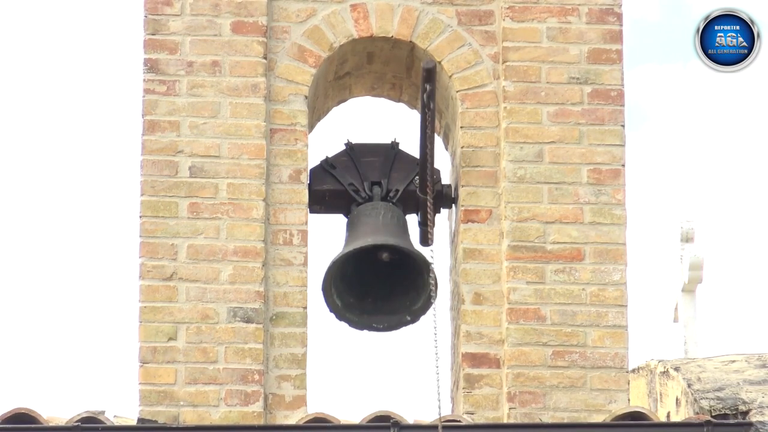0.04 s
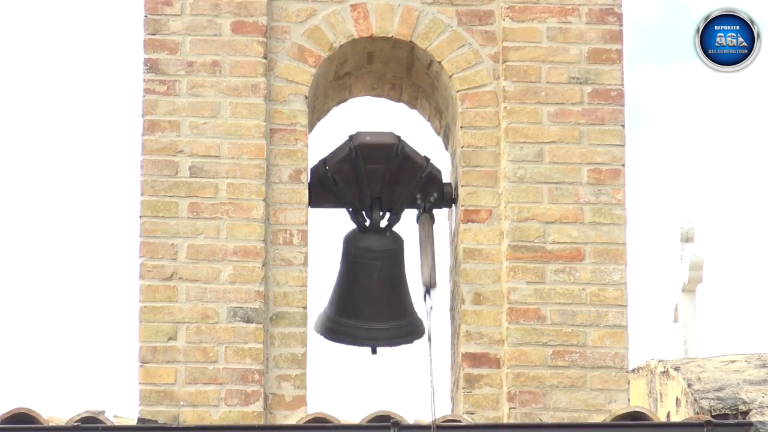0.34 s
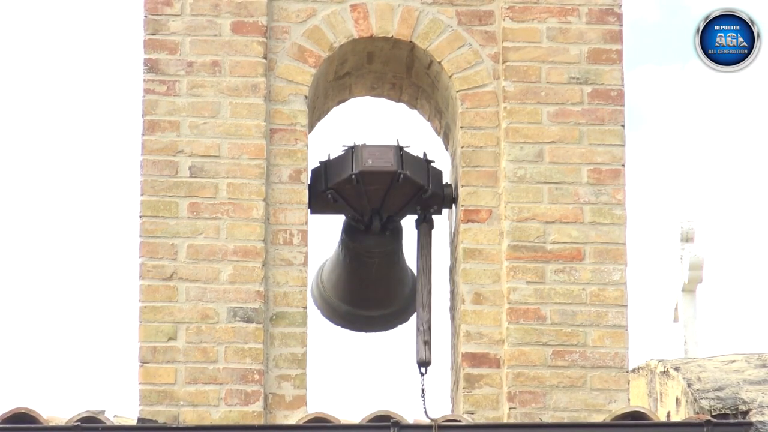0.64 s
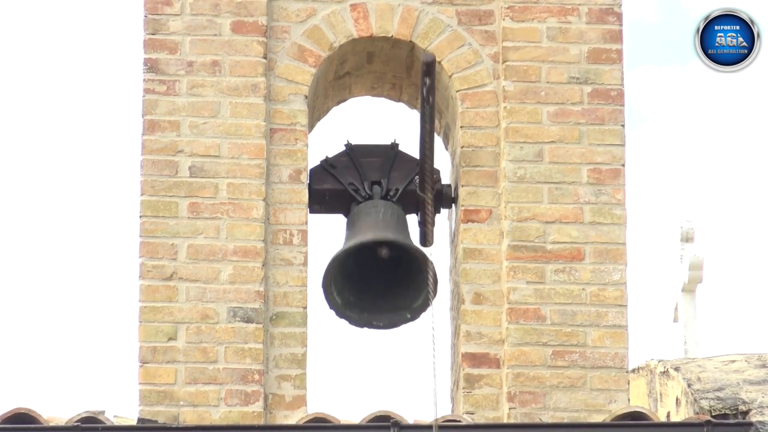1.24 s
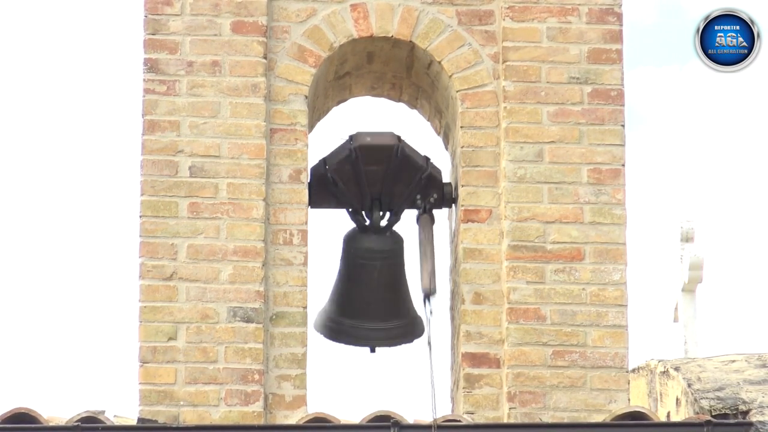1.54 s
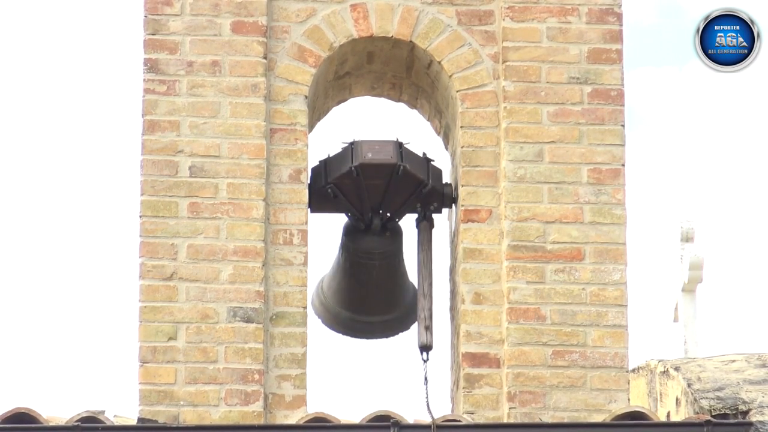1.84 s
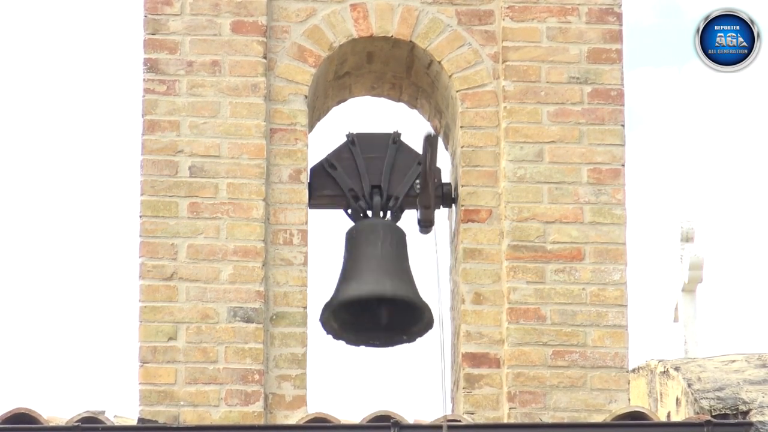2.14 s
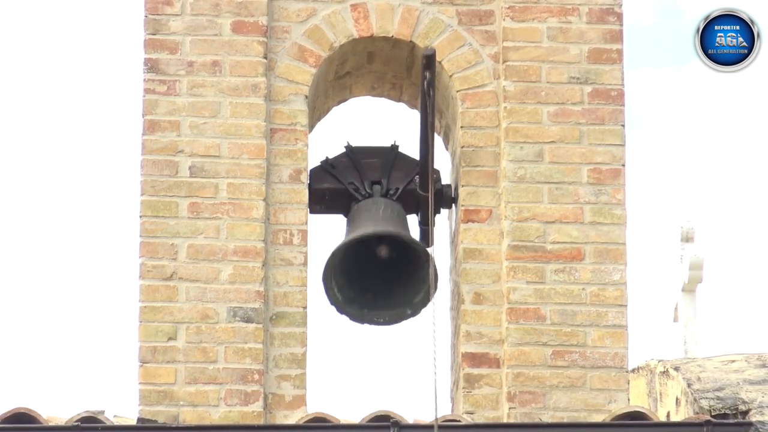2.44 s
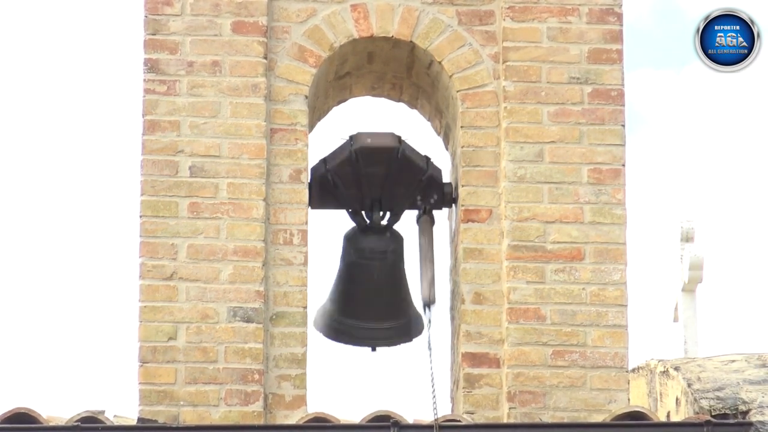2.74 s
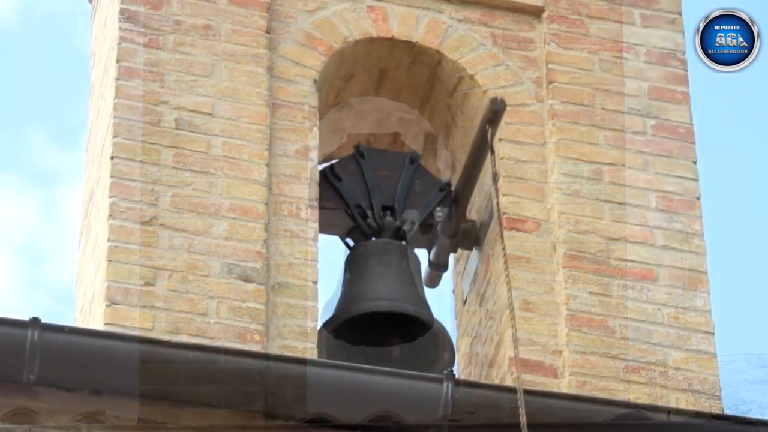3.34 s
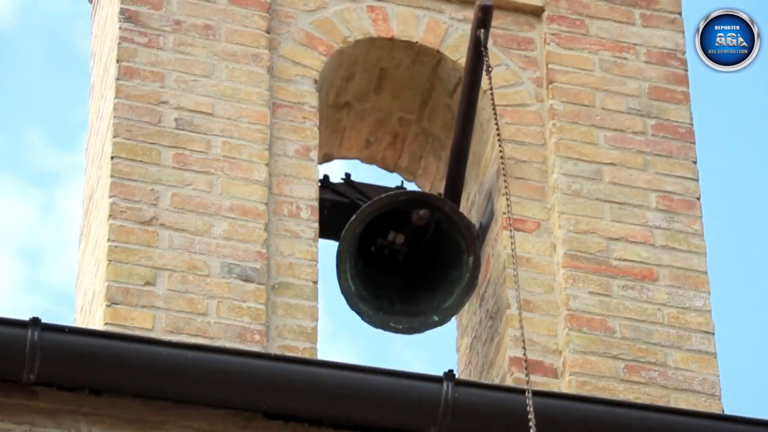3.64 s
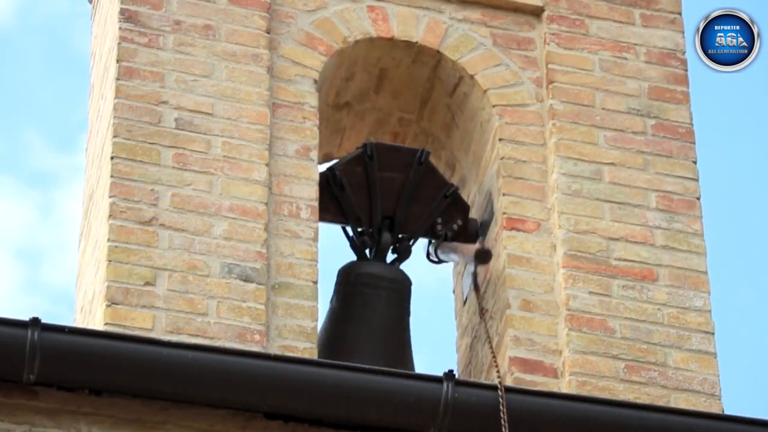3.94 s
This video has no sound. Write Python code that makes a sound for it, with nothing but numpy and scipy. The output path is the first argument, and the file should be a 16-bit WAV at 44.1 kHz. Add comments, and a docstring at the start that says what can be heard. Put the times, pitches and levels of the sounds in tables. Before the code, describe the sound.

A swinging tower bell clangs repeatedly with bright, wavering tones, creaks and rattles.

```python
"""A bronze bell, pulled by a rope, swings in a brick arch, its clapper striking hard on one side and
softly on the other. Each impact excites damped modes, which swell and dip by directivity and bend in
pitch by the Doppler effect as the bell turns. Between blows the headstock creaks by stick-slip friction,
each slip a click and a low knock in the frame, and the fittings squeak. Walls add a faint
reverberation, over outdoor air and rumble."""
import sys
import numpy as np
from scipy import signal
from scipy.fft import rfft, irfft, next_fast_len
from scipy.io import wavfile
from scipy.ndimage import map_coordinates

SR = 44100
rng = np.random.default_rng(int(sys.argv[2]) if len(sys.argv) > 2 else 0)


def waveform_to_disk(signal):
    """Save audio, clipped to [-1, 1], as 16-bit WAV at the path in sys.argv[1]."""
    frames = np.transpose(np.atleast_2d(signal))
    scaled = np.clip(frames, -1, 1) * 32767
    samples = np.round(scaled).astype(np.int16)
    wavfile.write(sys.argv[1], SR, samples)


N = 176400

# Clapper impacts: start_s, level_db, tilt_db_per_khz, clank_db
BLOWS = [(-.33, 6, -14, -30), (0.095, -3, 0.33, 5), (0.346, -9, -4.5, -8), (0.844, -6, -2, -8.5),
         (1.170, -1.5, 0, 6), (2.002, -4, -2, -16), (2.357, -3.5, 0.04, 3), (3.178, -2, -1.5, -3.5),
         (3.543, -5, -0.17, 3.5)]
# Main modes: pitch_hz, level_db, t60_s, facing_gain_db, node_width, node_positions (both in swing units)
PARTIALS = [(424, -22.5, 6.7, 5, 1, [0.85]), (955.4, -19, 4.9, 7, 0.39, [0.919]),
            (1076.7, -16, 3.97, 1.5, 0.1, [0.96, 0.38, -0.394, -1.1]),
            (1449.6, -21.5, 2.83, 2.5, 0.12, [0.95, 0.65, 0.115, -0.065]),
            (1861.2, -11, 2.15, 2.5, 0.056, [0.831, 0.6, .08, -0.437]),
            (2401, -10.5, 0.49, 10, 0.22, [0.92, 0.64]), (2525, -22, 1.91, 2.5, 0.093, [0.73, 0.16]),
            (2807.5, -10.5, 1.25, 3.5, 0.23, [.88, 0.14]), (3004, -23.5, 0.81, -5, 0.11, [.3]),
            (3895, -10, 1.21, 9.5, 0.38, [0.99, 0]), (5108, -16.5, 1.04, 5, 0.31, [1.036]),
            (6376, -24, 0.74, 8, 0.15, [.2])]
# Upper modes: pitch_hz, level_db
SHIMMER = [(2915, -14.5), (3140, -19), (3838, -21), (4236, -37), (4404, -33), (4669, -32), (4998, -26),
           (5158, -21.5), (5312, -27.5), (5685, -24.5), (6250, -58), (6564, -30), (6757, -34.5),
           (7253, -34.5), (7714, -22.5), (7864, -35), (8015, -36), (8221, -32), (8422, -31), (9059, -38),
           (9277, -28.5), (9545, -34.5), (9734, -41), (10228, -36), (10327, -37), (10467, -49),
           (10749, -32.5), (11349, -48), (11551, -45), (11766, -40), (11840, -40), (12315, -53),
           (13345, -53), (13804, -52), (13946, -38), (14550, -50), (15661, -45)]
# Decay of the upper modes: pitch_hz, t60_s
SHIMMER_DECAY = [(3100, 0.3), (3800, 1.25), (4400, .75), (5700, 0.89), (9000, 0.55), (15000, 0.5)]
# Turning points of the swing: time_s, position (1 = mouth towards the listener, -1 = away)
SWING = [(-.4, -.7), (.17, .79), (.75, -.9), (1.345, .89), (1.93, -.95), (2.53, 1), (3.12, -1), (3.72, 1),
         (4.3, -1)]
# Reflections from the arch: delay_s, level_db, share_of_rim_travel
ARCH_ECHOES = [(.006, -15.5, -0.928), (0.0111, -19.5, 0.385)]
# Spectrum of the clapper's contact: frequency_hz, level_db
CLANK_SPECTRUM = [(100, 0), (600, -8.5), (1200, -3), (2800, 6.5), (5000, 0), (8000, -7.5), (12000, -23),
                  (16000, -25)]
# Stick-slip bursts: start_s, length_s, slips_per_s, click_db, rattle_db, knock_db
CREAKS = [(0.47, .044, 136, 1.5, 1, 1.5), (0.572, 0.11, 79.6, -2.5, -4, 2), (0.729, .01, 51, -12, -12, -17),
          (0.79, .055, 30, -5.5, -11.5, 2), (0.858, 0.066, 67, -4.5, -4.5, -5),
          (0.92, .025, 78, -20, -28, 5.5), (0.952, .008, 70, -4, -1, 10), (0.971, .048, 95, -1, 0, 0),
          (1.052, .014, 87, -7, -4, -16), (1.639, 0.051, 116, 3, 2, 0), (1.71, .01, 45, -10, -5.5, 3),
          (1.775, 0.072, 60, -5, -6.5, -2), (1.875, .01, 46, -13.5, -13, 0.5),
          (1.983, .07, 63, -6.5, -5.5, -8.5), (2.119, 0.032, 65, -7, -2, 3),
          (2.156, 0.053, 110, 0.5, 0.5, -1), (2.854, 0.039, 155, 0, -0.5, -4),
          (2.956, 0.09, 78, -3, -3.5, 2.5), (3.085, .01, 55, -15.5, -18, -6),
          (3.196, 0.087, 54, -6, -2.5, -5.5), (3.335, 0.07, 98, -1, 2, -0.5),
          (3.933, .03, 58, -27, -16.5, -25.5)]
# Spectra of a slip's click, the fittings' rattle and the frame's knock: frequency_hz, level_db
CLICK_SPECTRUM = [(2000, -33), (5500, -4), (7000, -9), (8100, 4.5), (9000, -0.5), (11000, 2.5),
                  (12800, -5.5), (13600, 1), (14200, -9), (15700, -8)]
RATTLE_SPECTRUM = [(200, -13), (450, -5), (750, -8), (1200, 1.5), (1700, -2.5), (2700, -2), (3500, -5.5),
                   (5700, -6.5), (7000, -15.5), (14000, -37)]
KNOCK_SPECTRUM = [(25, -41), (55, -26.5), (75, 1.5), (100, -3), (125, -3.5), (170, -3), (215, -10.5),
                  (320, -10), (450, -23), (800, -30.5), (3000, -59)]
# Resonances of the wooden headstock: centre_hz, width_hz, level_db
HEADSTOCK_MODES = [(159.4, 16, 3), (204.4, 11, -2), (257, 23, -8.5), (314, 64, -8)]
# Squeaks of the fittings: start_s, pitch_hz, level_db
SQUEAKS = [(2.445, 1140, -36), (2.805, 2000, -35), (3.64, 750, -67), (3.93, 730, -32)]
# Reverberation among the walls: frequency_hz, t60_s
WALL_DECAY = [(100, 0.19), (1500, 1), (12000, 1)]
# Spectra of the outdoor background: frequency_hz, level_db
AIR_SPECTRUM = [(20, -6.5), (120, -10.5), (400, -40), (800, -35), (1500, -34), (3000, -40), (6000, -46),
                (10000, -54), (16000, -60)]
RUMBLE_SPECTRUM = [(20, -43), (45, 2), (110, -0.5), (200, -10.5), (400, -20), (900, -61), (4000, -75)]
# Likeness of left and right noise: frequency_hz, correlation
COHERENCE = [(25, 0.33), (70, 0.96), (200, 1), (1000, 0.94), (4000, 0.74), (8000, 0.66), (14000, 0.58)]
# Channel imbalance: frequency_hz, left_over_right_db
BALANCE = [(30, -1), (80, 0), (1000, -1.5), (4000, -0.7), (12000, -2)]

ATTACK_S = .003  # rise of the bell's response to a blow


def bell(rim_travel_m=0.273, sound_m_per_s=343, node_leak=0.057):
    """Directivity and Doppler shift: nodes sweep past, and the moving rim bends the tone and its echoes."""
    t = np.arange(N) / SR
    position = swing(t)
    ring = np.zeros((2, N))
    for hz, db, t60_s, facing_db, width, nodes in PARTIALS:
        dips = [np.hypot(np.tanh((position - node) / width), node_leak) for node in nodes]
        directivity = np.prod(dips, axis=0) * amp(facing_db * position)
        ring += bell_mode(hz, db - 0.5, t60_s) * directivity
    for hz, db in SHIMMER:
        ring += bell_mode(hz, db + 1, along(SHIMMER_DECAY, hz)) * lobe_flicker()
    ring += dense_modes()

    def ring_at(time_s):
        return np.array([map_coordinates(channel, [time_s * SR], mode="mirror") for channel in ring])
    lead_s = rim_travel_m / sound_m_per_s * position
    echoes = sum(amp(db) * ring_at(t - delay_s + share * lead_s) for delay_s, db, share in ARCH_ECHOES)
    return ring_at(t + lead_s) + echoes


def bell_mode(hz, db, t60_s, pan_db=1, spread_rad=0.24):
    """Damped vibration: a mode gains energy at each blow; left and right differ in level and phase."""
    t = np.arange(N) / SR
    start_s, blow_db, tilt, _ = np.transpose(BLOWS)
    phase = 2 * np.pi * (hz * t + rng.random())
    pan, lead = rng.choice([-1, 1], (2, 1, 1)) * np.array([[1], [-1]])
    envelope = ringing(start_s, db + blow_db + tilt * hz / 1e3, t60_s, ATTACK_S)
    return amp(pan_db * pan) * np.sin(phase + spread_rad * lead) * envelope


def swing(t):
    """Pendulum motion: the position follows half a cosine between turning points."""
    turn_s, position = np.transpose(SWING)
    index = np.arange(len(turn_s))
    turn, fraction = np.divmod(np.interp(t, turn_s, index), 1)
    return np.interp(turn + (1 - np.cos(np.pi * fraction)) / 2, index, position)


def lobe_flicker(depth_db=3.5, knots_per_s=18):
    """Amplitude modulation: a smooth random gain stands for an upper mode's narrow radiation lobes."""
    t = np.arange(0, N / SR + .01, .005)
    wander = map_coordinates(rng.standard_normal(200), [t * knots_per_s], mode="mirror")
    return np.interp(np.arange(N) / SR, t, amp(depth_db * wander))


def dense_modes(count=100, low_hz=2250, high_hz=12600, db=-35.5, fall_db_per_khz=0.5, t60_s=.33):
    """Modal superposition: many weak high modes ring briefly, most strongly after hard blows."""
    t = np.arange(SR // 2) / SR
    khz = (np.linspace(low_hz, high_hz, count) + rng.normal(0, 70, count)) / 1e3
    tones = np.sin(2e3 * np.pi * khz[:, None] * t + rng.uniform(0, 2 * np.pi, (count, 1)))
    mode_db = db - fall_db_per_khz * (khz - khz[0]) + rng.normal(0, 3, count)
    stereo_db = mode_db + rng.normal(0, 2, (2, count))
    envelope = np.exp(-np.log(1000) * t / t60_s) * (1 - np.exp(-t / ATTACK_S))
    out = np.zeros((2, N + SR))
    for start_s, blow_db, tilt, _ in BLOWS[1:]:  # the first blow falls before time zero
        gains = amp(stereo_db + blow_db + tilt * khz + rng.normal(0, 0.67, count))
        onset = round(start_s * SR)
        out[:, onset:onset + len(t)] += gains @ tones * envelope
    return out[:, :N]


def clank():
    """Impact noise: iron on bronze gives a short, harsh broadband crash."""
    start_s, _, _, db = np.transpose(BLOWS)
    return noise(CLANK_SPECTRUM) * ringing(start_s, db - 15, t60_s=0.12, rise_s=ATTACK_S)


def creaks(swell_db=3, scatter_db=2.2, jitter_share=.1):
    """Stick-slip friction: each slip clicks, rattles the fittings, rings the wood and knocks the frame."""
    slips = []
    for start_s, length_s, rate, click_db, rattle_db, knock_db in CREAKS:
        scatter, jitter = rng.standard_normal((32, 2)).T
        count = int(np.clip(np.ceil(length_s * rate), 1, len(scatter)))
        for k in range(count):
            db = swell_db * (np.sin(np.pi * (k + .5) / count) - 1) + scatter_db * scatter[k]
            slip_s = start_s + (k + jitter_share * jitter[k] * (k > 0)) / rate
            slips.append((slip_s, click_db + db, rattle_db + db, knock_db + db))
    slip_s, click_db, rattle_db, knock_db = np.transpose(slips)
    click = noise(CLICK_SPECTRUM) * ringing(slip_s, click_db - 20.5, t60_s=0.038, rise_s=.0001)
    rattle = noise(RATTLE_SPECTRUM) * ringing(slip_s, rattle_db - 17.5, t60_s=0.057, rise_s=.0001)
    wood = headstock() * ringing(slip_s, rattle_db - 19.5, t60_s=0.1, rise_s=0.0059)
    knock = noise(KNOCK_SPECTRUM) * ringing(slip_s, knock_db - 23, t60_s=0.3, rise_s=0.013)
    return click + rattle + wood + knock


def headstock():
    """Resonance: the wood passes noise near its natural frequencies."""
    def response(f):
        return sum(amp(db) / (1 + (2 * (f - hz) / width) ** 2) for hz, width, db in HEADSTOCK_MODES)
    return unit(filtered(rng.standard_normal(N), response))


def squeaks(width_share=0.078):
    """Narrow-band noise has a pitch: brief bursts of it are the squeaks of the fittings."""
    out = np.zeros(N)
    for start_s, hz, db in SQUEAKS:
        band = filtered(rng.standard_normal(N), lambda f: np.exp(-((f / hz - 1) / width_share) ** 2))
        out += unit(band) * ringing(np.array([start_s]), np.array([db]), t60_s=0.14, rise_s=0.0066)
    return out


def walls(x):
    """Reverberation: diffuse reflections form an exponential tail, shortest in the bass."""
    hz, t, spectra = signal.stft(rng.standard_normal((2, SR // 2)), SR, nperseg=256)
    decay = np.exp(-np.log(1000) * t / along(WALL_DECAY, hz)[:, None])
    tail = signal.istft(spectra * decay, SR, nperseg=256)[1]
    return signal.fftconvolve(x, tail / np.linalg.norm(tail[0]), axes=1)[:, :N]


def outdoors():
    """Stationary noise: faint air and a low rumble."""
    return amp(-34.5) * noise(AIR_SPECTRUM) + amp(-36) * noise(RUMBLE_SPECTRUM)


def ringing(start_s, db, t60_s, rise_s):
    """Energy balance: hits add energy, damping drains it, and amplitude is its square root."""
    loss_per_s = 2 * np.log(1000) / t60_s
    hit_energy = amp(db) ** 2 * np.exp(loss_per_s * np.minimum(start_s, 0))  # hits before zero have faded
    supply = np.bincount(np.clip(start_s * SR, 0, N - 1).astype(int), hit_energy, N)
    decay, rise = np.exp(-loss_per_s / SR), np.exp(-1 / (rise_s * SR))
    energy = signal.lfilter([1 - rise], [1, -decay - rise, decay * rise], supply)
    return np.sqrt(np.abs(energy))


def noise(spectrum):
    """Partial coherence: independent mid and side signals make coloured stereo noise of rms 1."""
    def response(hz):
        angle = np.arccos(np.clip(along(COHERENCE, hz), -1, 1)) / 2
        return amp(along(spectrum, hz)) * np.array([np.cos(angle), np.sin(angle)])
    mid, side = filtered(rng.standard_normal((2, N)), response)
    return unit(np.array([mid + side, mid - side]))


def filtered(x, response):
    """Linear filtering: the spectrum is multiplied by a frequency response."""
    size = next_fast_len(N + SR // 4)
    return irfft(rfft(x, size) * response(np.fft.rfftfreq(size, 1 / SR)), size)[..., :N]


def along(points, hz):
    """Interpolation on a logarithmic frequency axis."""
    point_hz, values = np.transpose(points)
    return np.interp(np.log(hz + 1), np.log(point_hz + 1), values)


def amp(db):
    """Amplitude ratio from decibels."""
    return 10 ** (np.asarray(db) / 20)


def unit(x):
    """Normalisation to rms 1."""
    return x / np.sqrt(np.mean(x ** 2) + 1e-20)


def scene():
    """Superposition: the bell, its mounting, their reverberation and the background add."""
    bronze = bell() + clank()
    mounting = creaks() + squeaks()
    reverberation = walls(amp(-18.5) * bronze + amp(-20.5) * mounting)
    return bronze + mounting + reverberation + outdoors()


def record(dry):
    """Soft saturation rounds the peaks of slightly unequal channels; a steep low-pass limits the band."""
    cutoff_hz = 15900
    x = filtered(dry, lambda hz: amp(along(BALANCE, hz) * np.array([[.5], [-.5]])))
    saturated = x / (1 + np.abs(x) ** 6) ** (1 / 6)
    return filtered(saturated, lambda hz: 1 / (1 + (hz / cutoff_hz) ** 120))


dry = scene()
out = record(dry)
waveform_to_disk(out)
```